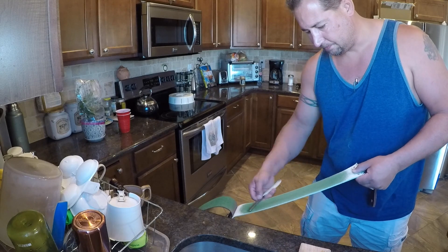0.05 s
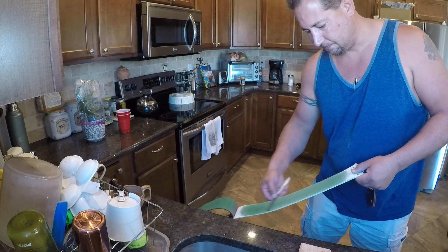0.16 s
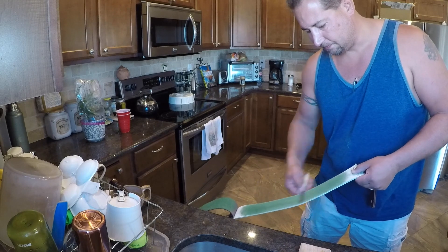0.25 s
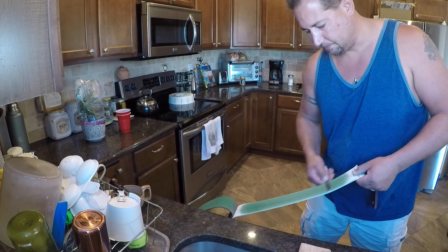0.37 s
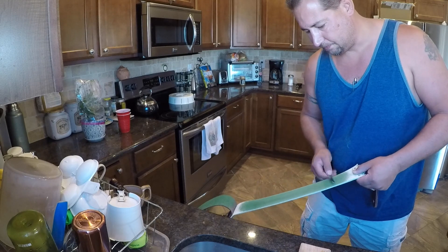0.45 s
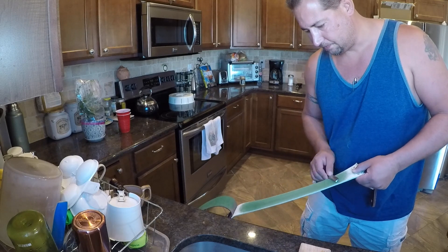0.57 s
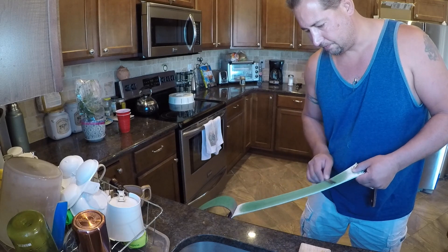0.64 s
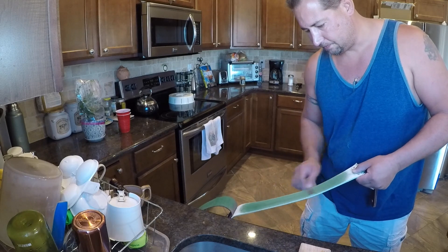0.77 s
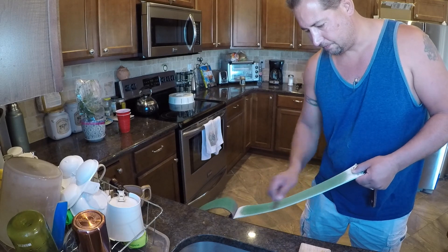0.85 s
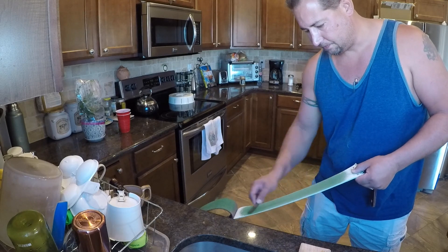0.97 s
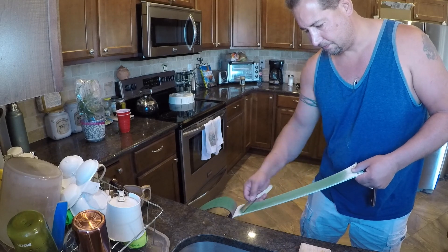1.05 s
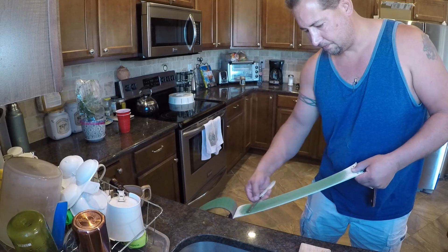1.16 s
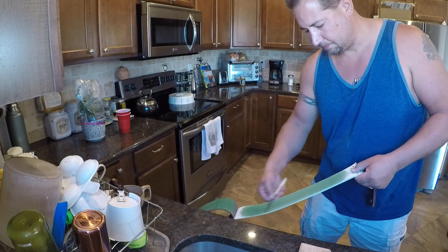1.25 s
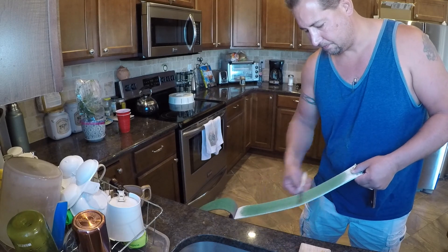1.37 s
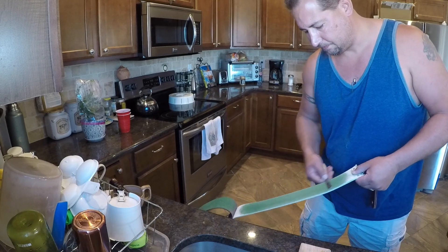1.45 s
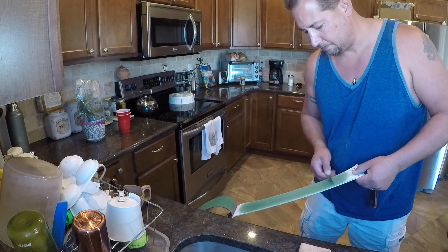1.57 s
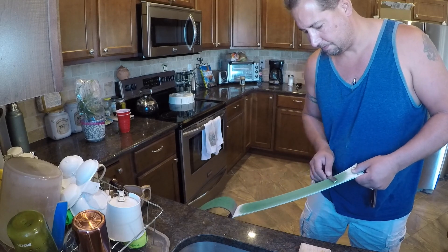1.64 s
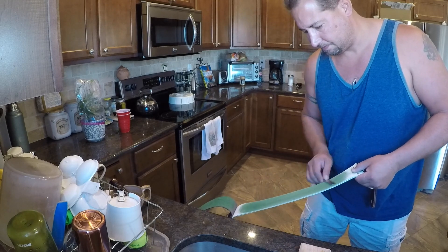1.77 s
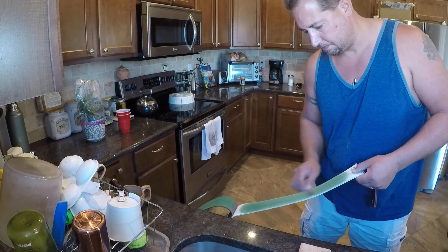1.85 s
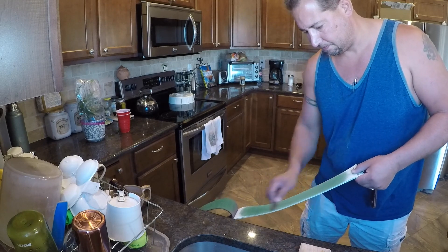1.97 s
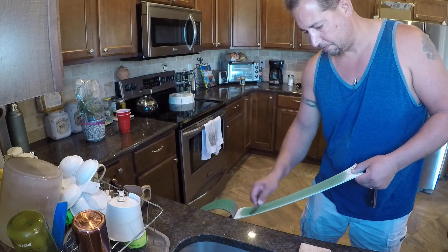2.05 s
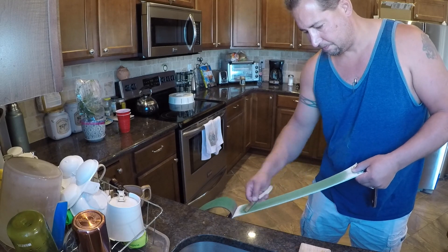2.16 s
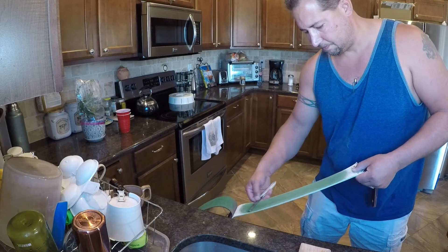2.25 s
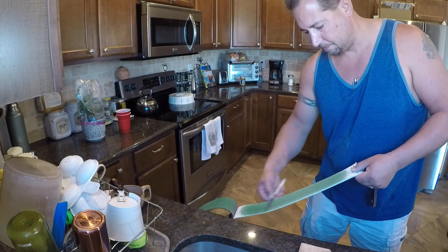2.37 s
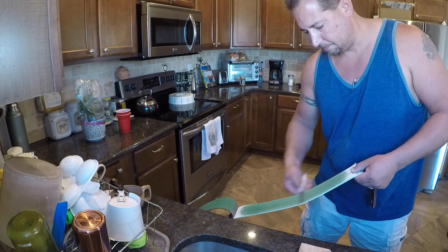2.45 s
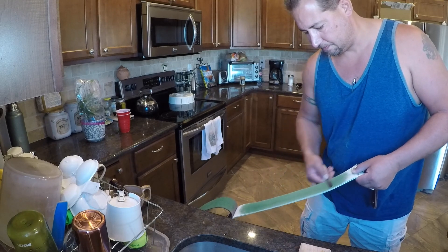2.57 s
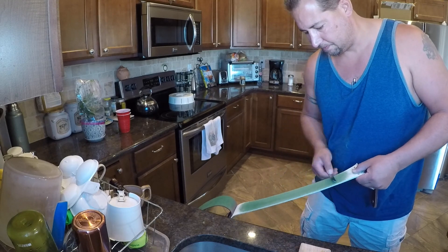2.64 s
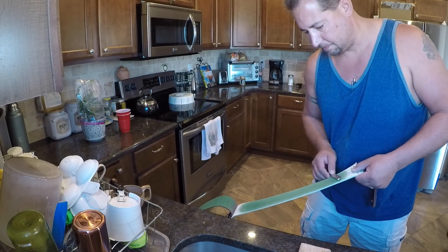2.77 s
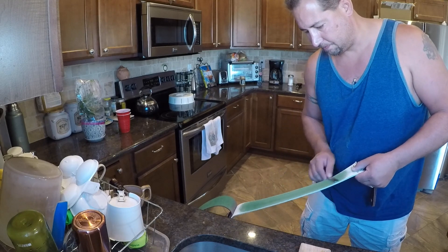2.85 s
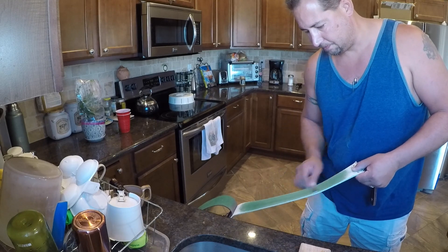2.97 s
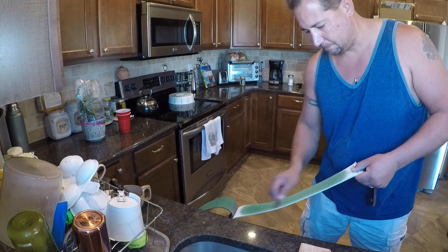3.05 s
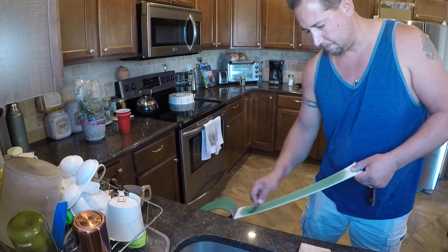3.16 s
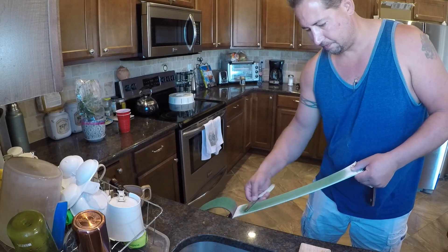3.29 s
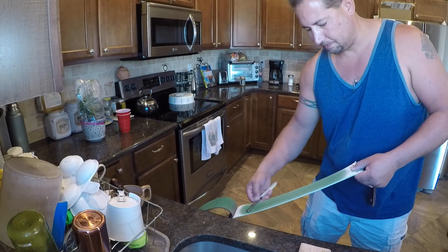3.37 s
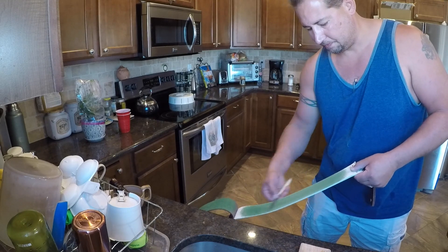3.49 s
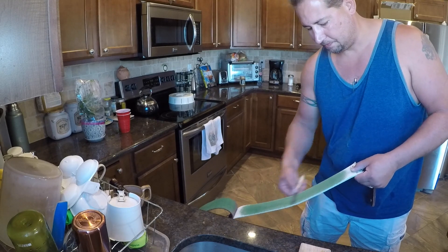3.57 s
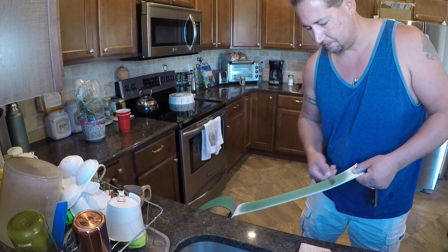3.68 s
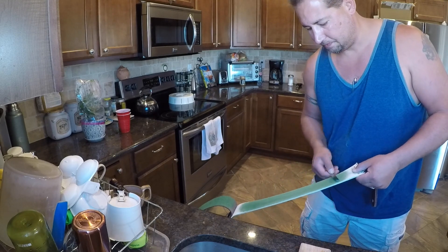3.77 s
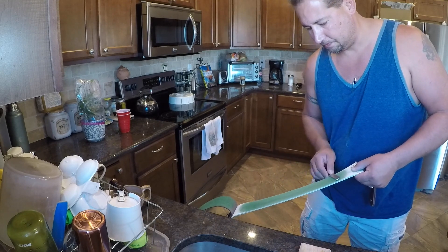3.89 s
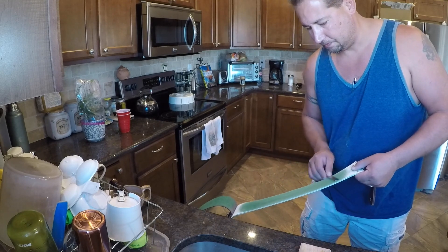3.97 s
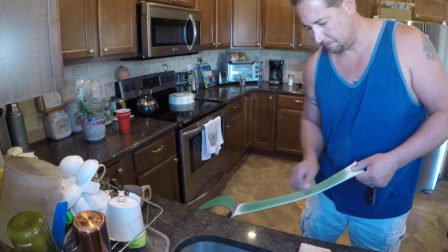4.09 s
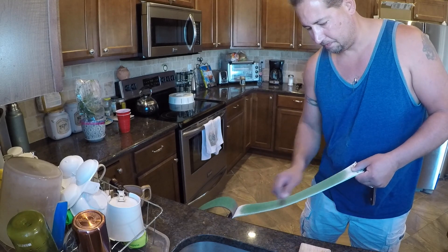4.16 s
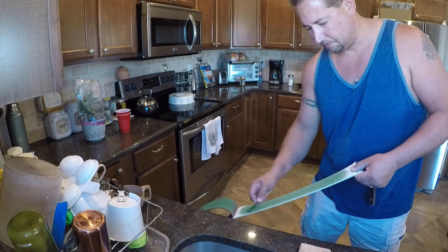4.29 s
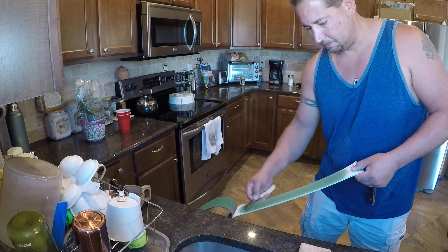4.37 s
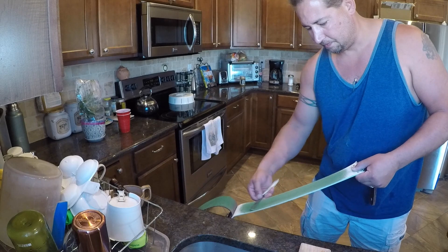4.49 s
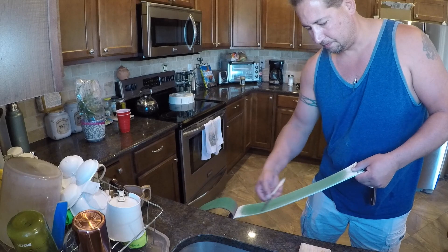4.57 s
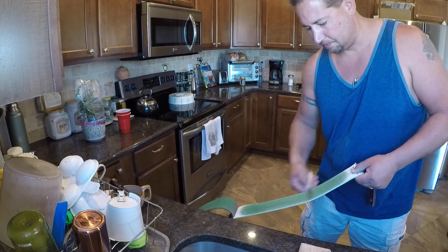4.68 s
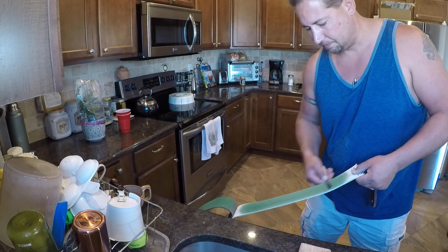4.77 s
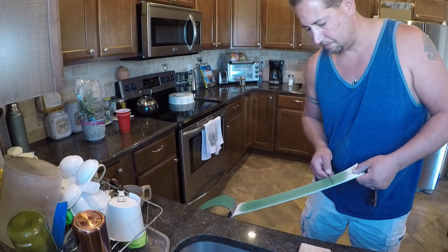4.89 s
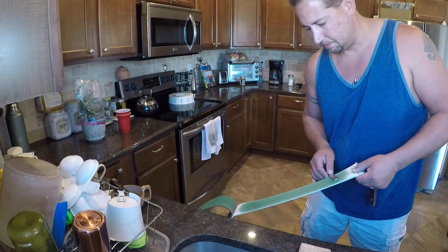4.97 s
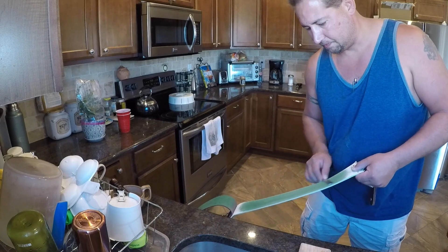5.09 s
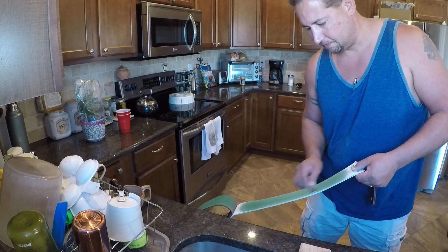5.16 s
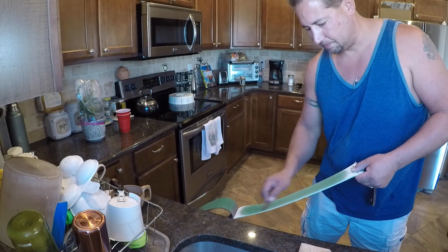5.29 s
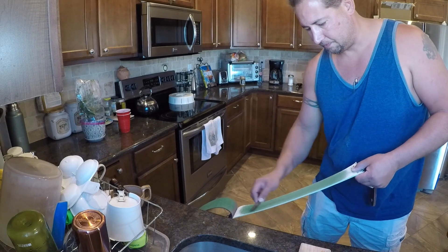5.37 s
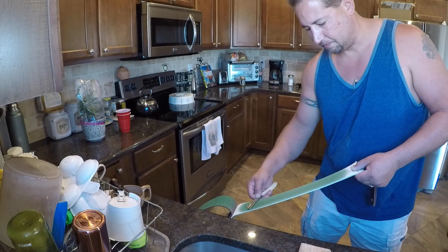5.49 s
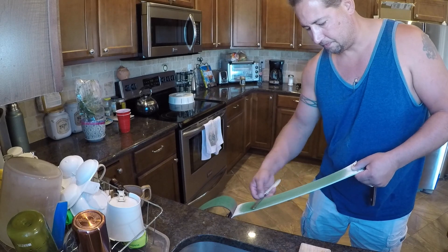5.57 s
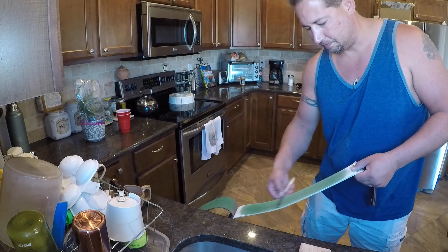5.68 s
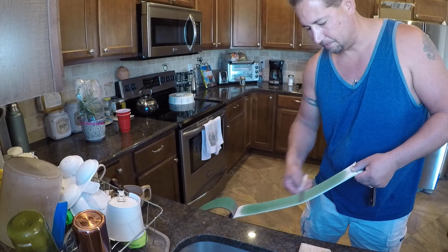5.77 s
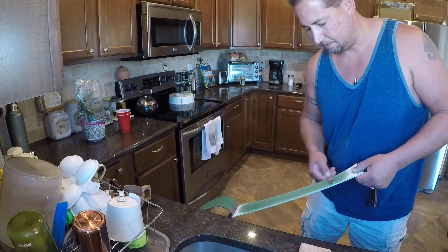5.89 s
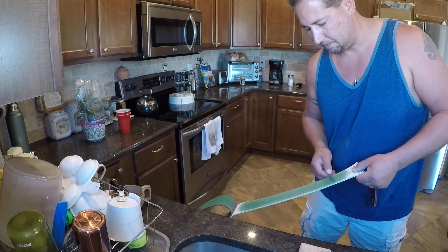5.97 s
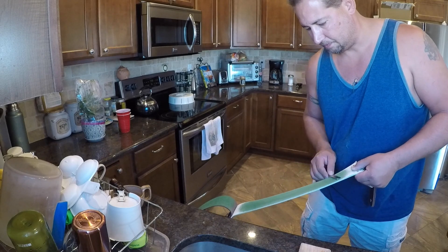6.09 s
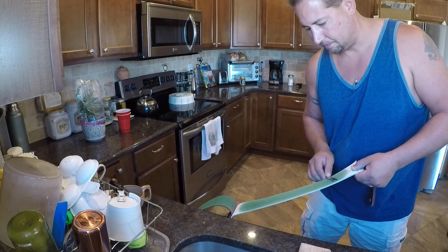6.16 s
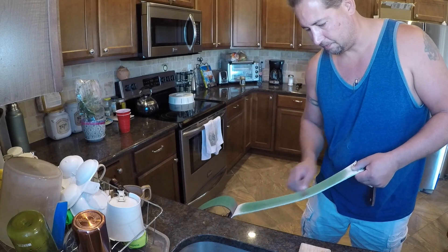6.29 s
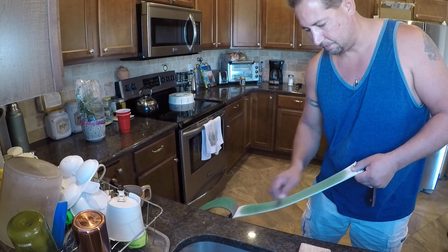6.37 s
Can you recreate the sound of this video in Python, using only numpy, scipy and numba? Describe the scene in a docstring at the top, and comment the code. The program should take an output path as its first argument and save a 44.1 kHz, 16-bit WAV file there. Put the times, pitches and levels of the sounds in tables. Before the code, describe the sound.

A razor is drawn back and forth over a taut canvas strop, about two strokes a second. Each stroke swells into a dry scrape, many with a brief pitched zip at the fastest point, then the blade lifts. The sound rings briefly off kitchen cupboards and tiles. A small stereo microphone about two metres away also picks up a steady appliance drone and faint hiss.

```python
"""A kitchen, heard on a small stereo camera: an appliance drones under microphone hiss throughout.
Two metres away, a razor is drawn to and fro over a taut canvas strop, twelve strokes in six seconds.
In each, the edge settles and scrapes the fibres, then at top speed skips from thread to thread with
a pitched zip. The blade lifts, and hard cupboards and tiles ring on."""
import sys
import numpy as np
from scipy import signal
from scipy.fft import rfft, irfft, next_fast_len
from scipy.io import wavfile
from scipy.ndimage import uniform_filter1d
from numba import njit

SR = 44100
rng = np.random.default_rng(int(sys.argv[2]) if len(sys.argv) > 2 else 0)


def transcribe(signal):
    """Save signal, clipped to [-1, 1], as a 16-bit WAV file at the path in sys.argv[1]."""
    frames = np.atleast_2d(signal).T
    limited = np.clip(frames, -1, 1)
    pcm = np.round(limited * 32767).astype(np.int16)
    wavfile.write(sys.argv[1], SR, pcm)


N = 283563


def undb(db):
    """Gain of a level in dB."""
    return 10 ** (np.asarray(db) / 20)


def level(x, db):
    """Scale x to an rms level."""
    return x * undb(db) / np.sqrt(np.mean(x ** 2))


def along(points, hz):
    """Read (Hz, value) points on a log-frequency axis."""
    freqs, values = np.transpose(points)
    return np.interp(np.log(np.maximum(hz, 1)), np.log(freqs), values)


def colour(x, points):
    """Filter x by a curve of (Hz, dB) points."""
    n = next_fast_len(x.shape[-1])
    gain = undb(along(points, np.arange(n // 2 + 1) * SR / n))
    return irfft(rfft(x, n) * gain, n)[..., :x.shape[-1]]


def wander(rate):
    """Random values held 1 / rate s and smoothed twice; spread near 1."""
    hold = int(SR / rate)
    steps = np.repeat(rng.standard_normal(N // hold + 1), hold)
    return 1.3 * uniform_filter1d(uniform_filter1d(steps, hold), hold)[:N]


@njit
def bandpass(x, hz, damp):
    """Band-pass whose centre can move; damp = width / centre."""
    y, band_state, low_state = np.empty(len(x)), 0., 0.
    for i in range(len(x)):
        g = np.tan(np.pi * hz[i] / SR)
        band = (band_state + g * (x[i] - low_state)) / (1 + g * (g + damp))
        band_state = 2 * band - band_state
        low_state += 2 * g * band
        y[i] = damp * band
    return y


# Sound from all around, at the microphone pair. Each row: frequency in Hz, left-right correlation.
MIC_LIKENESS = [(50, 0.51), (130, 0.59), (290, 0.0047), (700, -0.51), (1400, -0.34), (2800, 0.18),
                (4500, 0.49), (7500, -0.34), (11000, 0.44), (13000, 1)]
def diffuse(size):
    """White noise for left and right, as alike in each band as the two microphones hear it."""
    n = next_fast_len(size)
    likeness = np.clip(along(MIC_LIKENESS, np.arange(n // 2 + 1) * SR / n), -1, 1)
    mid, side = rfft(rng.standard_normal((2, n))) * np.sqrt([(1 + likeness) / 2, (1 - likeness) / 2])
    return irfft(np.array([mid + side, mid - side]), n)[:, :size]


# Room tone where the camera stands. Each row: frequency in Hz, relative level in dB.
ROOM_TONE = [(15, -39), (30, -22), (65, -33), (95, -34), (118, -28.5), (145, -1), (186, 2.5), (250, -3.5),
             (326, -8.5), (462, -5.5), (529, -12), (1540, -17.5), (4870, -31), (7280, -24.5),
             (12100, -33.5), (13800, -41), (15000, -44)]
ROOM_TONE_DB, HUM_HZ, HUM_DB = -48, 55.6, -75
def room_tone():
    """An appliance drones over a low, wavering hum; microphone hiss fills the top."""
    hum = np.sin(2 * np.pi * HUM_HZ * np.cumsum(1 + 0.0254 * wander(6)) / SR)
    hum *= undb(1.1 * wander(2.65))
    drone_and_hiss = level(colour(diffuse(N), ROOM_TONE), ROOM_TONE_DB)
    return drone_and_hiss + level(hum, HUM_DB) * undb([[-1.5], [1.5]])  # hum leans right


# The kitchen's ring. Each row: octave centre in Hz, seconds to fall 60 dB, gain in dB.
ECHO_BANDS = [(314, 0.51, 2.5), (703, 0.66, 6.5), (1407, 0.45, 8), (2730, 0.38, 3), (5900, 0.54, 2.5),
              (12100, 0.25, 8)]
ECHO_BUILD_S = 0.0076
def kitchen_echoes(x):
    """Cupboards and tiles return dense echoes from all around; each octave dies at its own rate."""
    t = np.arange(SR) / SR
    tail = 0
    for hz, t60, db in ECHO_BANDS:
        octave = signal.butter(2, [hz / 1.45, hz * 1.45], "band", fs=SR, output="sos")
        equal_energy = np.sqrt(2 * np.log(1000) / t60 / SR)
        tail += signal.sosfilt(octave, diffuse(SR)) * undb(db - 60 * t / t60) * equal_energy
    build_up = 1 - np.exp(-(t / ECHO_BUILD_S) ** 2)
    return signal.fftconvolve(x[None], tail * build_up, axes=1)[:, :N]


# Canvas under the blade. Each row: frequency in Hz, relative level in dB.
FIBRE_SPECTRUM = [(150, -69), (250, 0.5), (543, -8.5), (651, 1), (751, -1.5), (998, -3.5), (1760, -6),
                  (2200, -1), (5500, -25), (7150, -98), (12100, -120)]
def strap_grains(resonance_hz, hollow):
    """Fibres catch and slip in grains that ring the strap: a slow blade drums, a fast one bites."""
    grains = rng.standard_normal(N) * undb(1.4 * wander(400) + 1.26 * wander(40))
    fibres = colour(grains, FIBRE_SPECTRUM)
    drum = bandpass(fibres, np.full(N, 450.), damp=0.64) * (hollow - 1)
    bite = bandpass(fibres, np.full(N, 2900.), damp=1.0) * (1 / hollow - 1)
    ring = 2 * bandpass(fibres, resonance_hz, damp=.4)
    return level(fibres + drum + bite + ring, -7.5)


# The edge's hiss. Each row: frequency in Hz, relative level in dB.
EDGE_SPECTRUM = [(2060, -2), (3500, 0), (3860, -0.5), (4860, -8.5), (6240, -4.5), (6960, 0), (9390, -18.5),
                 (11200, -20.5), (13700, -15), (15000, -60)]
def edge_hiss():
    """The thin edge adds a fine, flickering hiss."""
    flicker = rng.standard_normal(N) * undb(0.84 * wander(300))
    return level(colour(flicker, EDGE_SPECTRUM), -3.0)


# Strokes, two metres from the camera. Each row: hardest bite, lead-in and run-out in seconds, strap gain,
# hiss gain and surge at the bite in dB, strap resonance in Hz, hollowness in dB.
STROKES = [(.275, 0.23, .15, -43.5, -49.5, 3, 1080, 4.5), (.826, 0.2, 0.1, -41, -48, 7.5, 1280, -2.5),
           (1.405, 0.27, 0.11, -42, -49.5, 2.5, 1170, 5), (1.922, 0.2, .1, -40, -47.5, 10.5, 1420, 3),
           (2.48, .2, 0.1, -40, -47.5, 6.5, 1140, -0.5), (3.04, 0.22, 0.097, -40, -46, 9, 1260, 1.5),
           (3.61, 0.24, 0.087, -41.5, -49.5, 3.5, 1190, 0.5),
           (4.148, 0.19, 0.098, -39.5, -46, 6, 1230, -1.5), (4.688, .2, 0.14, -41, -49, 5.5, 1150, 1.5),
           (5.222, 0.17, .1, -40, -46.5, 12, 1240, 2), (5.77, .18, .15, -45.5, -51, 8, 1020, 5.5),
           (6.335, .2, .12, -40, -47.5, 13.5, 1560, 4.5)]
# A stroke's course, one list towards the hand holding the strop, one away. Each row: place (-1 touch,
# 0 bite, 1 lift), strap and hiss offsets in dB, resonance ratio, hollowness offset in dB.
STROKE_COURSES = [
    [(-1.3, -20, -26, 1.2, -2), (-0.73, -10, -12.5, 0.65, 0), (-0.54, -4, -5.5, .95, 9),
     (-0.25, 0.5, -3, 0.88, 3.5), (0.17, 1.5, 0.5, 1.13, -5), (0.14, 2.5, -5, 0.74, 11.5),
     (0.48, -18.5, -21, 1, 17), (1, -16, -26, .9, -6)],
    [(-1.26, -32, -16, 0.69, 0), (-0.71, -13, -9.5, 0.76, 5), (-0.47, -9, -8, 0.8, 13),
     (-0.1, -0.5, -2.5, 0.98, -4.5), (-0.047, -3, -3.5, 0.72, -13.5), (0.44, -5, -2.5, 1.38, 19),
     (0.6, 2.5, -16, 0.76, 0), (1, -5, -18, .9, 2)],
]
SURGE_S = (0.058, 0.023)  # towards the hand, away
HISS_SURGE_SHARE = 0.22
def razor_scrape():
    """The blade settles on the canvas, bites in a surge and lifts off, to and fro in turn."""
    t = np.arange(N) / SR
    strap_gain, hiss_gain = np.zeros((2, N))
    resonance_hz, hollow = np.full(N, 1000.), np.ones(N)
    for k, (bite_s, lead, run_out, strap_db, hiss_db, surge_db, hz, hollow_db) in enumerate(STROKES):
        at = (t >= bite_s - lead) & (t < bite_s + run_out)
        since = t[at] - bite_s
        progress = since / np.where(since < 0, lead, run_out)
        place, *course = np.transpose(STROKE_COURSES[k % 2])
        swell, shine, ratio, drumming = (np.interp(progress, place, column) for column in course)
        touch = signal.windows.tukey(int((lead + run_out) * SR) + 2, .4)[:at.sum()]
        surge = surge_db * np.exp(-(since / SURGE_S[k % 2]) ** 2)
        strap_gain[at] = touch * undb(strap_db + swell + surge)
        hiss_gain[at] = touch * undb(hiss_db + shine + HISS_SURGE_SHARE * surge)
        resonance_hz[at] = hz * ratio
        hollow[at] = undb(hollow_db + drumming)
    return strap_gain * strap_grains(resonance_hz, hollow) + hiss_gain * edge_hiss()


# Zips on the strop. Each row: centre in seconds, thread rate there in Hz, relative speed gain per second,
# length in seconds, unevenness from 0 to 1, gains of harmonics 1, 2 and 3 in dB,
# hang of harmonics 1 and 2 in dB relative to those gains.
ZIPS = [(.30, 600, -0.94, 0.024, 0.17, -50, -46, -54, -14, -14),
        (.345, 475, -3.5, 0.036, 0.15, -49.5, -51, -51, -15, -22),
        (0.842, 724.4, -0.65, 0.046, 0.12, -41.5, -40.5, -44, 9, 5),
        (1.425, 594.6, -1, 0.03, 0.15, -47.5, -42, -47.5, -1, 2),
        (1.944, 747, -0.35, 0.022, 0.06, -40.5, -36, -34.5, 5, -0.5),
        (2.47, 781, 0, 0.037, 0.13, -41, -47, -47, -16, -17),
        (2.51, 748, -1.8, 0.038, 0.19, -53, -39, -46, -14, -16),
        (2.555, 695, -1.8, 0.013, 0.1, -43.5, -46, -58, -10, -5),
        (3.05, 788.5, 0.5, 0.028, 0.086, -36, -34, -36, -7, -3),
        (3.61, 501, -1.3, 0.025, 0.091, -68, -55, -45, -20, -22),
        (3.655, 606.6, -0.7, 0.046, 0.19, -47.5, -43, -50, -14, -18),
        (4.155, 794.6, -0.45, 0.038, 0.078, -38, -38, -42, 1, 5.5),
        (4.695, 799, 0.2, 0.02, 0.13, -37, -38.5, -39.5, -24, -2.5),
        (4.735, 728, -0.1, 0.047, 0.13, -46, -39.5, -43.5, -10, -5),
        (5.236, 770, -0.6, 0.029, 0.07, -44, -37.5, -36.5, -7, 3.5),
        (5.77, 815, -1.2, 0.057, 0.15, -50, -53, -50.5, -16, -20),
        (5.825, 582, -1.5, 0.045, 0.16, -52, -42, -58, -12, -9),
        (5.865, 422, -1.5, 0.026, .15, -45, -61, -62, -16, -14),
        (6.344, 780.6, -0.7, 0.027, 0.061, -41, -39.5, -35, 2, 7.5)]
STROKE_HALF_S = .3  # from top speed to rest, roughly
UPPER_FALL_DB, EARLY_S = -8, 0.013  # step per harmonic above the third; lead from the third up
WEAVE_DB, WEAVE_FALL_DB = -7.5, -3  # half-way tones, and their step per harmonic
HANG_T60_S, THIRD_HANG_DB = .4, -10  # the third's hang is set against the second's
def thread_zips():
    """The edge drops off each thread in turn. Returns the tone, its hanging ring and skipping (0-1)."""
    tone, hang, skip = np.zeros(N), np.zeros((2, N)), np.zeros(N)
    waver = wander(150)
    flutter = np.array([wander(55) + 1j * wander(55) for _ in range(6)]).reshape(3, 2, N)
    for centre_s, hz, gaining, length, uneven, *harmonics_db, hang1_db, hang2_db in ZIPS:
        at = slice(int((centre_s - .15) * SR), min(int((centre_s + .5) * SR), N))
        t = np.arange(at.start, at.stop) / SR - centre_s
        speed = np.clip(1 - (t / STROKE_HALF_S) ** 2 + gaining * t, .1, 2)
        phase = 2 * np.pi * np.cumsum(hz * speed * (1 + 0.3005 * uneven * waver[at])) / SR
        span = length * np.where(t < 0, .7, 1.4)  # sets in faster than it lets go
        harmonics_db += [harmonics_db[2] + k * UPPER_FALL_DB for k in (1, 2, 3)]
        for k, db in enumerate(harmonics_db, 1):
            # every other thread lies higher, adding tones half-way between the harmonics
            weave = undb(WEAVE_DB + (k - 1) * WEAVE_FALL_DB) * np.sin((k + .5) * phase)
            flash = np.exp(-k ** 0.91 * ((t + (k > 2) * EARLY_S) / span) ** 2)  # higher is briefer
            tone[at] += undb(db) * (np.sin(k * phase + k * k) + weave) * flash
        skip_span = length * np.where(t < 0, 1.5, 2.5)
        skip[at] = np.maximum(skip[at], (1 - 3 * uneven) * np.exp(-(t / skip_span) ** 2))
        # three harmonics hang on at the centre pitch, wavering apart in the two microphones
        fade = undb(-60 * t / HANG_T60_S) / (1 + np.exp(-8 * t / length))
        for k, db in enumerate((hang1_db, hang2_db, hang2_db + THIRD_HANG_DB)):
            stereo = (.5 + .7 * flutter[k][:, at]) * [[1], [1j]]
            ring = np.exp(2j * np.pi * (k + 1) * hz * t) * stereo
            hang[:, at] += undb(harmonics_db[k] + db) * fade * ring.real
    return tone, hang, np.clip(skip, 0, 1)


SKIP_SHARE, ZIP_ECHO_DB = 0.38, -8
def scene():
    """Zip and scrape from two metres, with the kitchen's echoes and room tone."""
    zips, hang, skip = thread_zips()
    scrape = razor_scrape() * (1 - SKIP_SHARE * skip)  # a skipping edge scrapes less
    echoes = kitchen_echoes(scrape + undb(ZIP_ECHO_DB) * zips)
    return zips + scrape + echoes + hang + room_tone()


# The camera's microphone pair. Each row: frequency in Hz, left minus right in dB.
MIC_BALANCE = [(30, -3), (150, -.5), (300, -0.5), (700, -2.5), (1400, -0.9), (2800, -.7), (5500, -0.1),
               (9000, -4), (13000, 0.5)]
TOP_HZ = 15050
def record(dry):
    """The two microphones differ a little in colour; the camera cuts the top."""
    left = colour(dry[0], [(hz, db / 2) for hz, db in MIC_BALANCE])
    right = colour(dry[1], [(hz, -db / 2) for hz, db in MIC_BALANCE])
    return signal.sosfilt(signal.ellip(10, .2, 70, TOP_HZ, fs=SR, output="sos"), [left, right])


dry = scene()
out = record(dry)
transcribe(out)
```